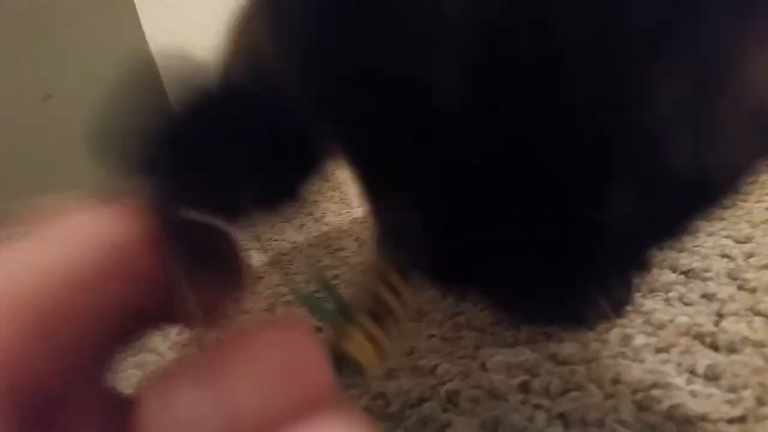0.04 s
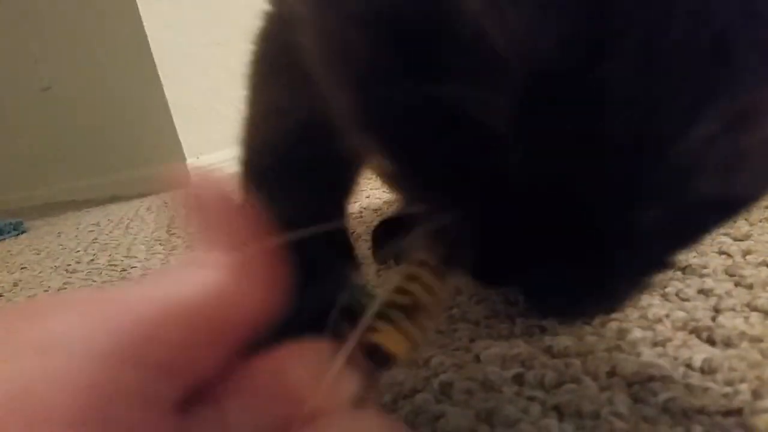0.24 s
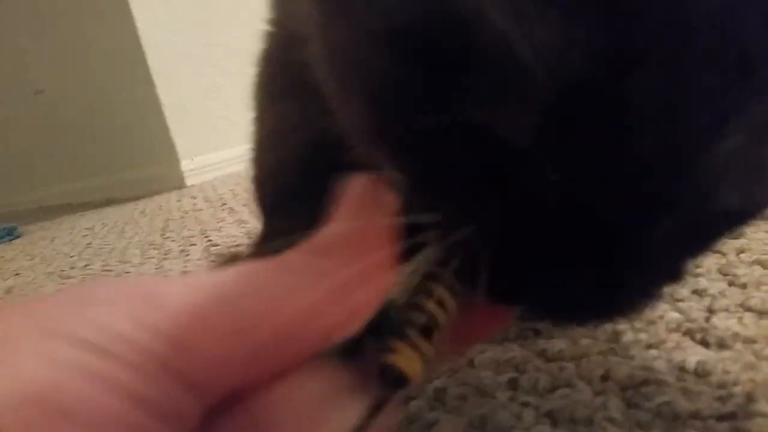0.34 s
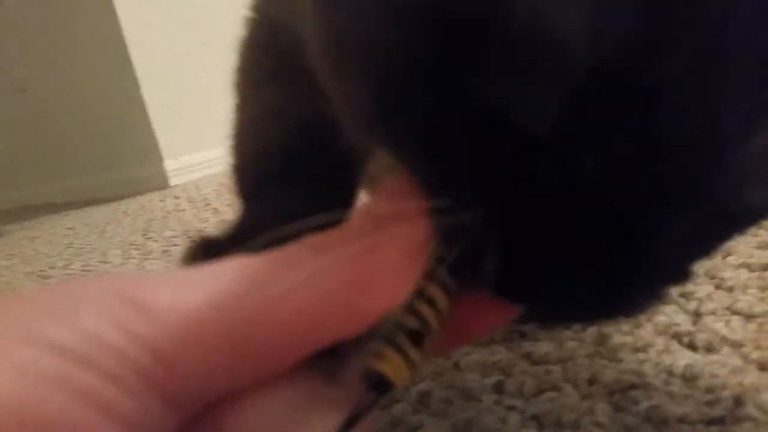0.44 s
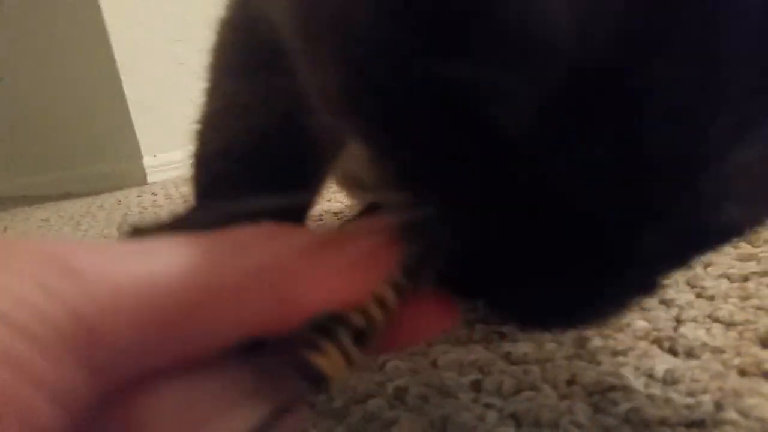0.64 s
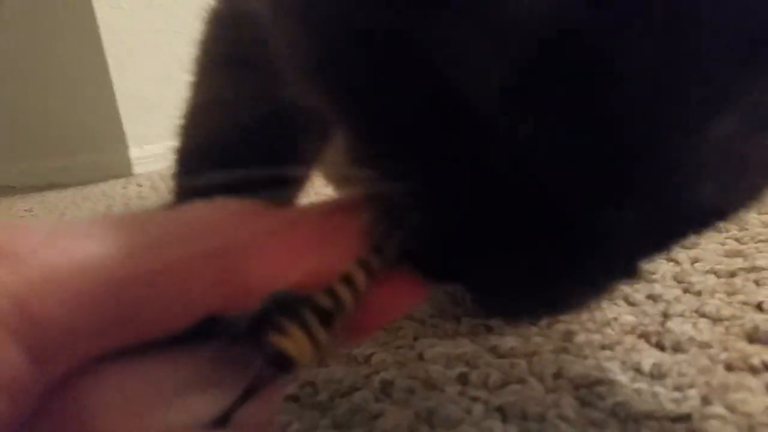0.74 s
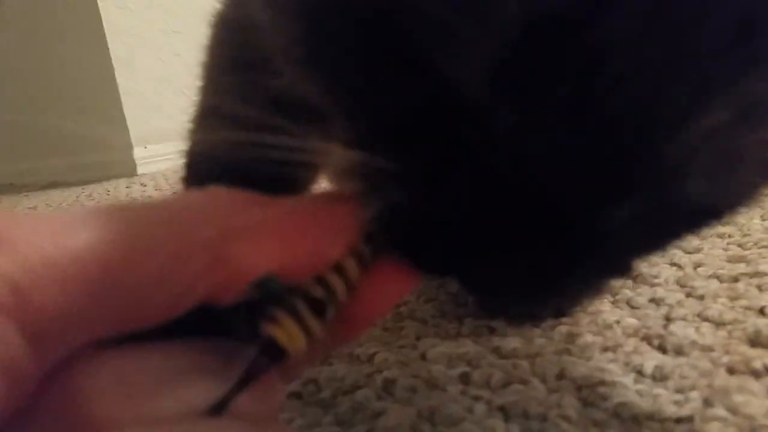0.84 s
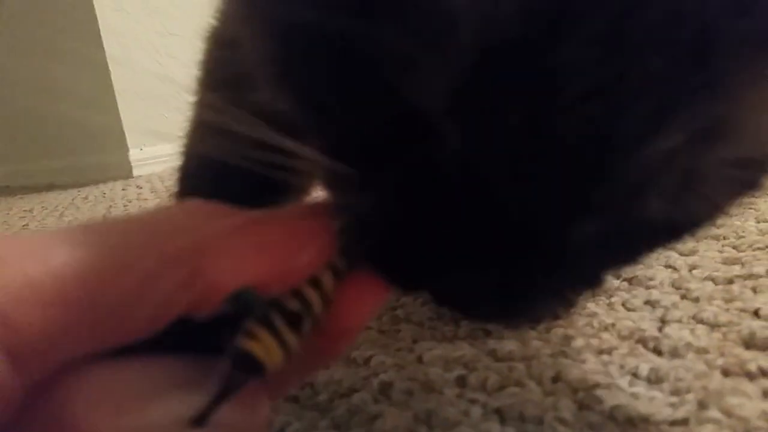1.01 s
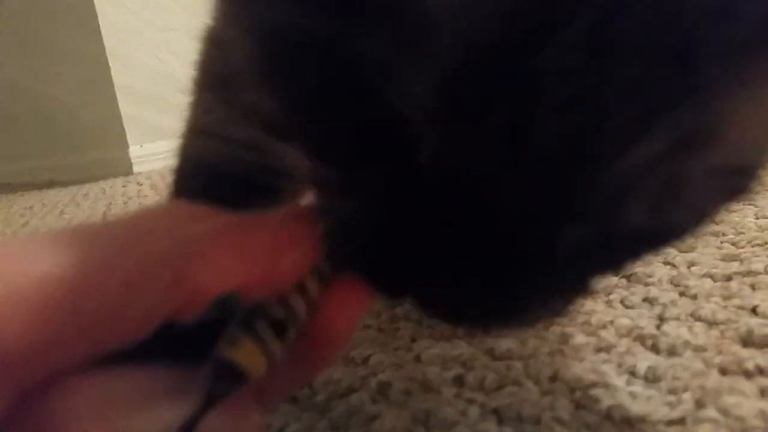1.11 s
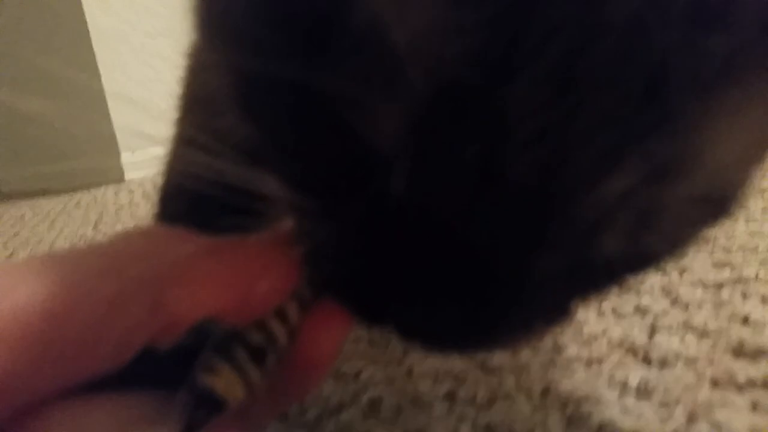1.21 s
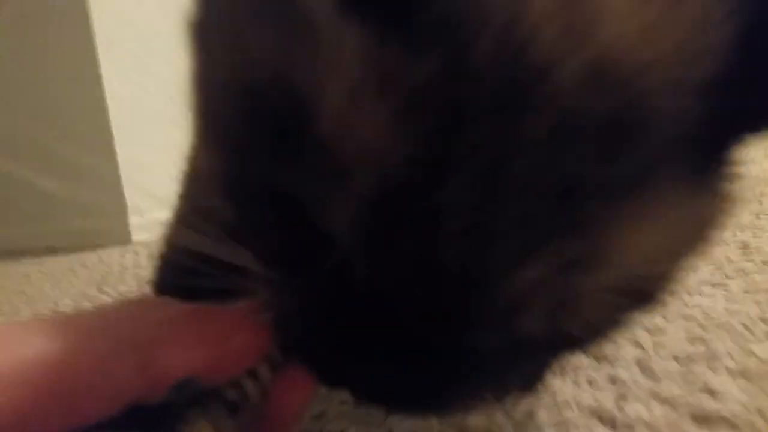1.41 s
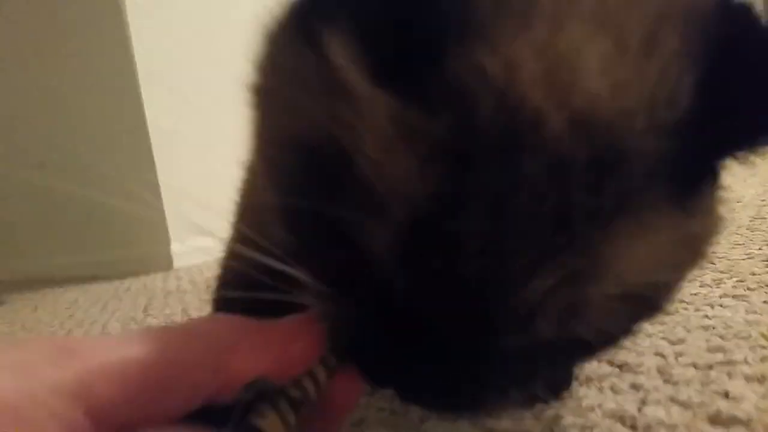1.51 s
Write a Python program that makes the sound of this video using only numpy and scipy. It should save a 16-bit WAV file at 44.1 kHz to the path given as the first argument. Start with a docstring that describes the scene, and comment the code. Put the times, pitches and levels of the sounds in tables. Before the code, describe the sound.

A cat growls through shut jaws, a high throbbing whine close up, while a toy ticks faintly

```python
"""A carpeted room: close to the microphone a cat growls through shut jaws, a clean high voice of harmonics
whose pitch throbs about 28 times a second. It chokes at some throbs while noise puffs through the nose.
A toy ticks and crackles as short noise in resonances; hand and fur thud and scuff as band-passed noise.
Behind them lie wavering sine hums, a short faint echo of the voice, and coloured room hiss and rumble."""
import sys
import numpy as np
from scipy import signal
from scipy.fft import rfft, irfft
from scipy.io import wavfile
from scipy.ndimage import uniform_filter1d

SR = 44100
rng = np.random.default_rng(int(sys.argv[2]) if len(sys.argv) > 2 else 0)


def persist_wave(psi):
    """Save psi, clipped to +-1, as 16-bit WAV."""
    counts = np.round(np.clip(psi, -1, 1) * 32767).astype(np.int16)
    wavfile.write(sys.argv[1], SR, np.atleast_2d(counts).T)


def field_ratio(decibels):
    """Amplitude ratio for a level in dB (20 dB per decade); scalars and array-likes work."""
    return 10 ** (np.asarray(decibels, dtype=float) / 20)


N = 68355   # length in samples


def rms_one(x):
    """Normalization: scale to a root mean square of 1."""
    return x / np.sqrt(np.mean(x ** 2) + 1e-20)


def in_time(s, values):
    """Linear interpolation: straight lines through timed values."""
    return np.interp(np.arange(N) / SR, s, values)


def at_hz(points, hz):
    """Logarithmic frequency scale: interpolate a spectrum along log f."""
    table = np.array(points)
    return np.interp(np.log(hz), np.log(table[:, 0]), table[:, 1])


def bell(s, width_s):
    """Gaussian envelope: a smooth hump of height 1, width_s being its standard deviation."""
    return np.exp(-.5 * ((np.arange(N) / SR - s) / width_s) ** 2)


def drift(rate_hz):
    """Random modulation: white noise through two equal low-pass poles, spread 1."""
    r = np.exp(-2 * np.pi * rate_hz / SR)
    slow = signal.lfilter([1], [1, -2 * r, r * r], rng.standard_normal(N + SR))
    return rms_one(slow[SR:])   # the settling second is dropped


def resonance(x, hz, width_hz):
    """Damped resonator: a two-pole peak of about unit gain."""
    r = np.exp(-np.pi * width_hz / SR)
    poles = [1, -2 * r * np.cos(2 * np.pi * hz / SR), r * r]
    return signal.lfilter([(1 - r * r) / 2, 0, (r * r - 1) / 2], poles, x + 1e-18)


def resonances(x, table):
    """Parallel formants: each resonator is applied twice for steeper skirts, then all are summed."""
    return sum(field_ratio(db) * resonance(resonance(x, hz, width), hz, width) for hz, width, db in table)


def pan(db):
    """Interaural level difference: left and right gains that differ by db."""
    return field_ratio(np.array([[db / 2], [-db / 2]]))


def lag_right(x, lag_s):
    """Arrival-time difference: a linear phase shift delays the right channel."""
    turn = np.exp(-2j * np.pi * np.fft.rfftfreq(N, 1 / SR) * lag_s)
    return np.array([x[0], irfft(rfft(x[1]) * turn, N)])


# throbs of the throat, from low pitch to high and back:
# [t/s, low f/Hz, high f/Hz, relative level/dB, share of the throb spent climbing (0-1)]
THROBS = [(0.21, 600.7, 673.7, -33.5, 0.4), (0.242, 470, 561.2, -22.5, 0.62),
          (0.277, 470, 558.6, -22.5, 0.6), (0.309, 459.3, 579.6, -24.5, 0.7),
          (0.343, 501, 602.9, -24.5, 0.7), (0.375, 483, 610, -23, 0.65), (.409, 503.4, 770.6, -24.5, 0.73),
          (0.444, 557.3, 777, -23.5, 0.67), (0.479, 550, 697.6, -25, 0.8), (0.511, 519.7, 646.7, -26, 0.8),
          (0.549, 500, 627.3, -24.5, 0.7), (0.587, 492.4, 609.3, -22.5, 0.7), (0.623, 495, 598.7, -23, 0.6),
          (0.659, 492.5, 561.6, -22, 0.4), (0.693, 468.5, 567.9, -22.5, 0.4), (0.73, 468, 585.4, -22, 0.5),
          (0.765, 483.4, 636.6, -23, 0.4), (0.803, 481.5, 641.4, -24.5, 0.8),
          (0.832, 472.3, 656.8, -24.5, 0.64), (0.865, 489, 639, -22, .72), (0.913, 505.2, 597, -24, 0.6),
          (0.949, 469.4, 570.3, -24.5, 0.6), (.987, 469.4, 571.2, -23, 0.53),
          (1.027, 450.6, 548.6, -24, 0.5), (1.061, 444.9, 545.6, -21.5, 0.6),
          (1.096, 429, 536.4, -22.5, 0.6), (1.13, 437, 570.5, -22, 0.75), (1.167, 443.6, 540.2, -22, 0.74),
          (1.204, 426, 588.6, -21.5, 0.67), (1.242, 452, 602, -25, 1), (1.258, 454, 600, -33, .5)]
# mouth opening: [t/s, overtone level against the fundamental/dB, tilt per overtone/dB]
MOUTH = [(0.227, -9.5, -13), (.237, 1, 1.5), (0.3, 5, 1), (0.378, 0.5, .5), (.5, 2, 2), (.649, 2.5, 0),
         (0.801, 0, 1), (1.0, 0, -1), (1.2, 0, -3.5)]
# transfer function of head and shut mouth: [f/Hz, level/dB]
HEAD = [(440, -2), (500, -1), (550, 0), (700, -7.5), (1000, -2), (1300, -8.5), (1600, -16.5), (2100, -27.5),
        (2700, -38), (3300, -37.5), (4500, -73.5)]
# the throat chokes: [t/s, half width of the closing/s, overtone level change/dB, fundamental level change/dB]
CHOKES = [(.439, .002, -8, -4), (.475, .002, -6, -4), (.685, .003, -6, 3), (.716, .004, -10, 5),
          (.755, .008, -16, 5), (.790, .004, -16, 5), (.828, .010, -28, -20), (.861, .010, -20, -3),
          (.897, .005, -14, -10), (.935, .005, -16, 2), (1.156, .005, -12, 2), (1.194, .011, -30, -6),
          (1.196, .003, -5, -22), (1.234, .014, -32, -22)]
RISE_SHAPE, FALL_SHAPE = 1.2, 2   # powers of the quarter-sine climb and drop
SWELL_DB, OVERTONE_SWELL_DB = 2, 2.5   # rise of fundamental and overtones through each throb
NOTCH_DB, NOTCH_S = 3.5, 0.0042   # the fundamental dips at the low point
JITTER, SHIMMER_DB = .0035, .8   # random spread of pitch (share) and overtones (times root n)
RASP_DB, CHOKE_RASP_DB = -27, 3   # the rasp swells while the throat chokes
REOPEN = .4   # a choked throat reopens in this share of the time it takes to shut
BOOM_LAG_S = .0025   # the fundamental answers a choke this much later
VOICE_ON_S, ATTACK_S = 0.2114, .012
VOICE_OFF_S, RELEASE_S = 1.252, .002   # exponential release


def growl():
    """Source-filter principle: harmonics of a throbbing pitch shaped by the head, plus cycle-gated rasp."""
    t = np.arange(N) / SR
    s, low_hz, high_hz, level_db, climb = np.transpose(THROBS)
    throb = in_time(s, np.arange(len(s)))
    k, u = throb.astype(int), throb % 1   # number of the throb, progress through it
    top = np.clip(climb[k], .1, .9)
    rise = np.minimum(u / top, 1)
    fall = np.minimum((1 - u) / (1 - top), 1)
    arch = np.sin(np.pi / 2 * rise) ** RISE_SHAPE * np.sin(np.pi / 2 * fall) ** FALL_SHAPE
    floor_hz = in_time(s, low_hz)
    smooth_hz = uniform_filter1d(floor_hz + (high_hz[k] - floor_hz) * arch, size=90)
    hz = smooth_hz * (1 + JITTER * drift(180))
    phase = 2 * np.pi * np.cumsum(hz) / SR

    shut = [np.exp(-((t - at) / np.where(t > at, REOPEN * w, w)) ** 4) for at, w, _, _ in CHOKES]
    progress = uniform_filter1d(u - .5, size=200)
    first_db = SWELL_DB * progress - NOTCH_DB * sum(bell(at, NOTCH_S) for at in s)
    first_db = first_db + sum(row[3] * np.interp(t - BOOM_LAG_S, t, g) for row, g in zip(CHOKES, shut))
    at, bright_db, tilt_db = np.transpose(MOUTH)
    upper_db = in_time(at, bright_db) + OVERTONE_SWELL_DB * progress
    upper_db = upper_db + sum(row[2] * g for row, g in zip(CHOKES, shut))
    tilt = in_time(at, tilt_db)

    voice = field_ratio(first_db + at_hz(HEAD, hz)) * -np.cos(phase)
    for n in range(2, 11):
        shimmer = SHIMMER_DB * np.sqrt(n) * drift(66)
        db = upper_db + (n - 2) * tilt + at_hz(HEAD, n * hz) + shimmer
        voice = voice - field_ratio(db) * np.cos(n * phase)

    gated = rng.standard_normal(N) * (1 + np.cos(phase))   # noise pulses once a cycle
    rasp = rms_one(resonances(gated, [(550, 1400, 8.0), (1130, 1220, 7.5), (2840, 1200, -30)]))
    rasp = field_ratio(RASP_DB + CHOKE_RASP_DB * sum(shut)) * rasp
    attack = np.clip((t - VOICE_ON_S) / ATTACK_S, 0, 1) ** 2
    release = np.exp(-np.maximum(t - VOICE_OFF_S, 0) / RELEASE_S)
    return attack * release * field_ratio(in_time(s, level_db)) * (np.sqrt(2) * voice + rasp)


RING_HZ, RING_WIDTH_HZ, RING_DB = 540.7, 13.7, -4.5


def head_cavity(push):
    """Cavity resonance: a lightly damped cavity of the head rings on after each push of the voice."""
    return push + field_ratio(RING_DB) * resonance(push, RING_HZ, RING_WIDTH_HZ)


# air puffing through the nose: [t/s, level/dB before a common 10.5 dB cut, half length/s, left-right level/dB]
PUFFS = [(0.755, -40.5, 0.003, -4), (0.789, -47, 0.0018, -12), (0.821, -39, 0.0032, -3),
         (0.86, -38, 0.0035, -2), (1.193, -35, 0.0026, -7), (1.231, -37.5, 0.0045, -7),
         (1.263, -41, 0.0037, -7), (1.275, -41, 0.002, -15), (1.297, -54, 0.019, -6),
         (1.314, -37.5, 0.00076, -12), (1.355, -52, 0.0017, -35.5), (1.397, -62.5, 0.0045, -33), ]
# steady air between the puffs: [t/s, level/dB]
LEAK = [(.55, -80), (.7, -63), (1.3, -62), (1.45, -74)]
# nose resonances: [f/Hz, width of one pass/Hz, relative level/dB]
NOSE = [(2600, 1800, -6), (4650, 900, -8), (7350, 450, -4), (10400, 1000, 0), (12400, 900, -10)]


def puffs():
    """Turbulent flow: partly correlated stereo noise through the nose resonances, in short breaths."""
    white = rng.standard_normal((3, N))
    air = white[0] + 0.84 * white[1:]
    hiss = rms_one(resonances(air, NOSE))
    steady = field_ratio(in_time(*np.transpose(LEAK)))
    breaths = sum(pan(lr) * field_ratio(db - 10.5) * bell(s, w) for s, db, w, lr in PUFFS)
    return hiss * (steady + breaths)


# fibres of the toy tick: [t/s, relative level/dB, left-right level/dB, top ring against the lower rings/dB]
TICKS = [(.064, -51, 2, -10), (0.2227, -33, -9.5, -8), (0.337, -51, -12, -12), (0.357, -35.5, 2, 9.5),
         (0.36, -44, -26, -11.5), (0.3795, -43.5, 2.5, 5), (.383, -41.5, 0, -16), (.648, -27.5, -4, -15)]
# resonances of tick and crackle, two lower rings then the top ring: [f/Hz, width of one pass/Hz, relative level/dB]
TICK_RING = [(5000, 3000, -24), (10800, 2000, 0), (14800, 3500, -1)]
# crackle of fur and fibres: [t/s, level/dB]
RUSTLE = [(.1, -67), (.15, -58.5), (.2, -66), (0.271, -53.5), (.36, -58), (.45, -63.5), (1.2, -85),
          (1.3, -65)]
RUSTLE_PER_S = 3600   # mean grains a second in each channel
TICK_S = .0006   # half length


def toy():
    """Impulse excitation: noise bursts ring as lone ticks over a Poisson-like crackle of grains."""
    rough = rng.choice([-1, 1], N)
    low = sum(pan(lr) * field_ratio(db) * bell(s, TICK_S) for s, db, lr, _ in TICKS)
    top = sum(pan(lr) * field_ratio(db + top_db) * bell(s, TICK_S) for s, db, lr, top_db in TICKS)
    ticks = resonances(low * rough, TICK_RING[:2]) + resonances(top * rough, TICK_RING[2:])

    struck = rng.random((2, N)) < RUSTLE_PER_S / SR
    strength = field_ratio(3.6 * np.minimum(rng.exponential(1, (2, N)), 5))
    grains = struck * strength * rng.choice([-1, 1], (2, N))
    crackle = resonances(grains, TICK_RING[:2]) + 0.43 * resonances(grains, TICK_RING[2:])
    return 1.37 * ticks + field_ratio(in_time(*np.transpose(RUSTLE))) * rms_one(crackle)


# hand and fur bump and scuff near the microphone: [t/s, level/dB, half length/s, upper band edge f/Hz]
BUMPS = [(0.024, -36.5, 0.0045, 326), (0.053, -42.5, 0.012, 260), (0.132, -41.5, 0.0053, 328),
         (.815, -37, 0.017, 186.6), (.89, -48, 0.014, 154), (1.266, -47.5, 0.02, 2400),
         (1.33, -45.5, 0.0098, 353), (1.437, -56, 0.045, 2000), (1.399, -39.5, 0.0068, 288),
         (1.528, -39.5, 0.023, 203)]


def bumps():
    """Band-limited noise: two-octave bands under Gaussian envelopes, partly alike in the channels."""
    white = rng.standard_normal((3, N))
    noise = 2.0 * white[0] + white[1:]
    total = 0
    for s, db, w, hz in BUMPS:
        band = signal.butter(2, [hz / 4, hz], "band", fs=SR, output="sos")
        total = total + field_ratio(db) * bell(s, w) * rms_one(signal.sosfilt(band, noise))
    return total


# wavering hums: [f/Hz, pitch waver/Hz, mean level/dB]
HUMS = [(187, 4, -46)]
# faint tones come and go: [t/s, half length/s, level/dB, f/Hz]
FAINT = [(.085, .03, -52, 632), (.083, .005, -55, 1720), (1.48, .03, -51, 632)]


def hums():
    """Frequency modulation: sines with randomly wavering pitch, the lasting ones wavering in level too."""
    tones = sum(field_ratio(db + 2 * drift(23)) * np.sin(2 * np.pi * np.cumsum(hz + w * drift(10)) / SR)
                for hz, w, db in HUMS)
    faint = sum(field_ratio(db) * bell(s, w) * np.sin(2 * np.pi * np.cumsum(hz + 6 * drift(15.4)) / SR)
                for s, w, db, hz in FAINT)
    return np.sqrt(2) * (tones + faint)


ECHO_DB, ECHO_T60_S = -27, .15


def walls(x):
    """Reverberation: convolution with exponentially decaying noise, independent in each channel."""
    t = np.arange(SR // 4) / SR
    tail = rng.standard_normal((2, len(t))) * field_ratio(-60 * t / ECHO_T60_S) * (t > .004)
    tail = tail / np.sqrt(np.sum(tail[0] ** 2))
    return field_ratio(ECHO_DB) * signal.fftconvolve(x[None], tail, axes=1)[:, :N]


# left-right likeness of the room noise: [f/Hz, correlation (-1 to 1)]
LIKENESS = [(60, .6), (130, .75), (290, .8), (640, .8), (1410, 0), (6820, .3), (15000, -.1)]


def room_noise(spectrum):
    """Interchannel coherence: coloured noise mixed from mid and side to a set correlation, rms 1."""
    hz = np.maximum(np.fft.rfftfreq(N, 1 / SR), 1)
    mid, side = rfft(rng.standard_normal((2, N)))
    alike = np.clip(at_hz(LIKENESS, hz), -1, 1)
    both = np.sqrt(1 + alike) * mid + np.sqrt(1 - alike) * side * [[1], [-1]]
    return rms_one(irfft(both * field_ratio(at_hz(spectrum, hz)), N))


# treble spectrum of the room: [f/Hz, relative level per Hz/dB]
HISS = [(2060, -37), (3500, -3.5), (4460, 1), (6780, -19), (8600, -45), (9810, -39), (10300, -13),
        (12600, -32.5), (16000, -21)]
# bass spectrum of the room: [f/Hz, relative level per Hz/dB]
RUMBLE = [(22, -11), (87, -3), (155, -5), (213, -5.5), (377, -6), (497, -13.5), (641, -10.5), (728, -14.5),
          (845, -16.5), (3500, -30), (4550, -79.5)]
HISS_DB, RUMBLE_DB = -64.5, -43
PATCHY_DB = 1.2   # spread of the bass as it swells and sinks


def room():
    """Ambient noise: steady hiss over a rumble of randomly modulated level."""
    hiss = field_ratio(HISS_DB) * room_noise(HISS)
    return hiss + field_ratio(RUMBLE_DB + PATCHY_DB * drift(60)) * room_noise(RUMBLE)


VOICE_LAG_S, HISS_LAG_S = 0.000093, .00008   # the right microphone port hears later
VOICE_LR_DB = -0.6   # left against right


def scene():
    """Superposition: cat, toy, hand and room add as pressures."""
    voice = head_cavity(growl())
    near = lag_right(pan(VOICE_LR_DB) * voice, VOICE_LAG_S) + lag_right(puffs() + toy(), HISS_LAG_S)
    return near + bumps() + hums() + walls(voice) + room()


def band_limit(x):
    """A steep low-pass at the top of the band."""
    return signal.sosfilt(signal.butter(12, 17150, fs=SR, output="sos"), x)


MIC_DIP_HZ, MIC_DIP_Q = 8550, 6   # the microphone is deaf here
CUTOFF_HZ = 16170   # from here up the loss is at least 60 dB


def record(dry):
    """Frequency response: the microphone has a notch in its treble, and a steep low-pass cuts the top."""
    notched = signal.lfilter(*signal.iirnotch(MIC_DIP_HZ, MIC_DIP_Q, SR), dry)
    low_pass = signal.cheby2(20, 60, CUTOFF_HZ, fs=SR, output="sos")
    heard = signal.sosfilt(low_pass, notched)
    return band_limit(heard)


dry = scene()
out = record(dry)
persist_wave(out)
```